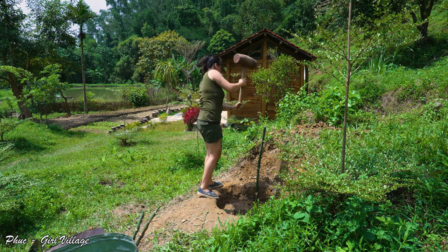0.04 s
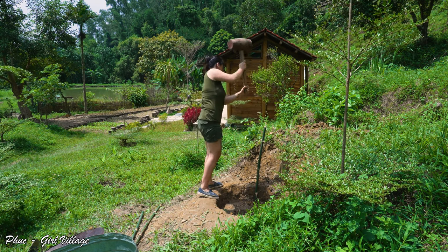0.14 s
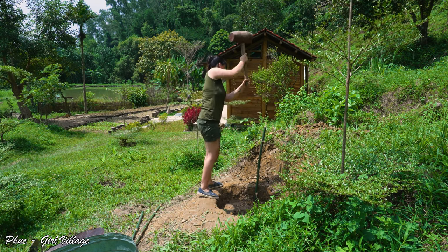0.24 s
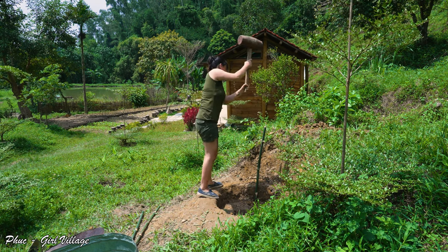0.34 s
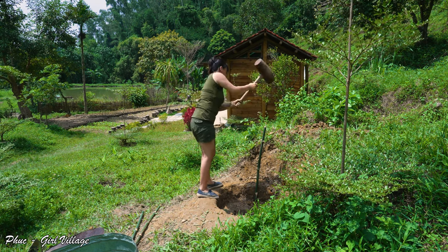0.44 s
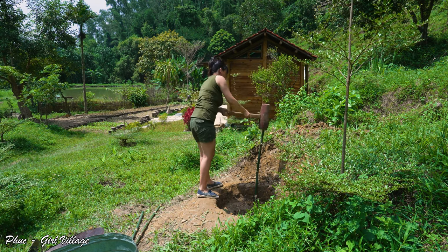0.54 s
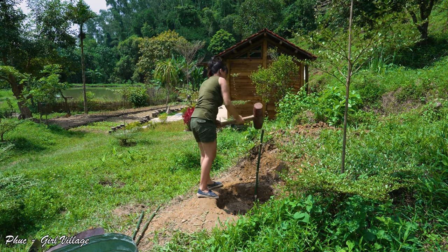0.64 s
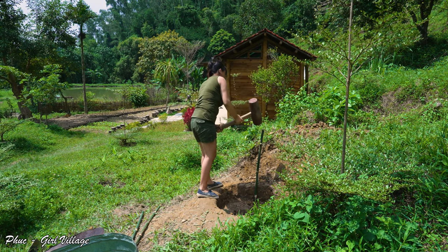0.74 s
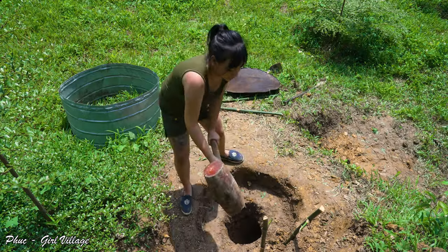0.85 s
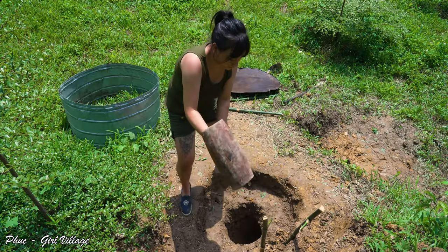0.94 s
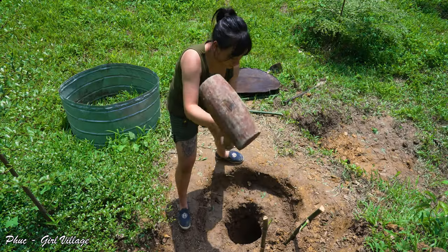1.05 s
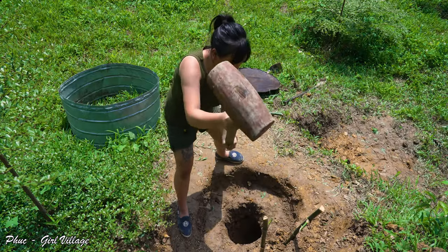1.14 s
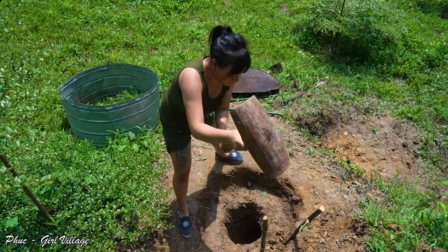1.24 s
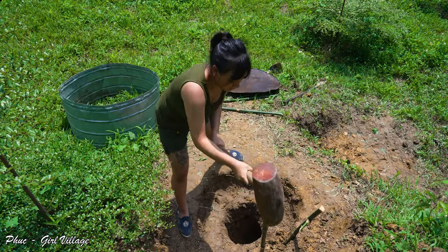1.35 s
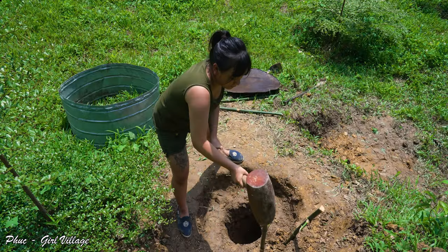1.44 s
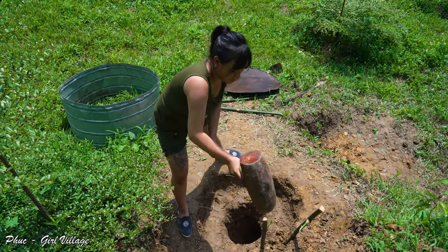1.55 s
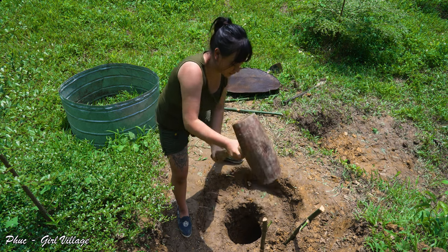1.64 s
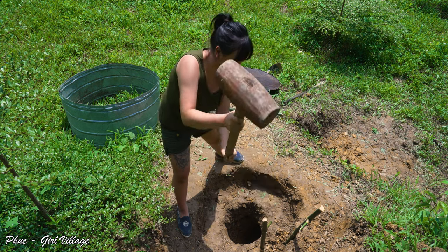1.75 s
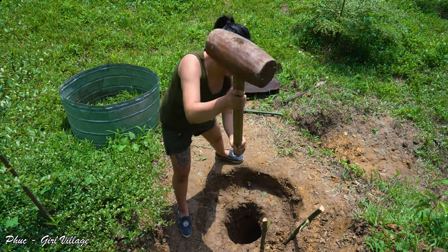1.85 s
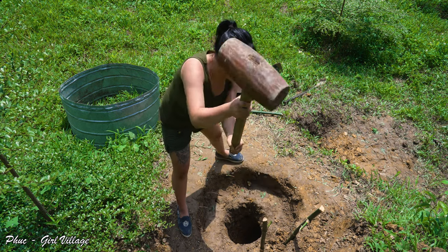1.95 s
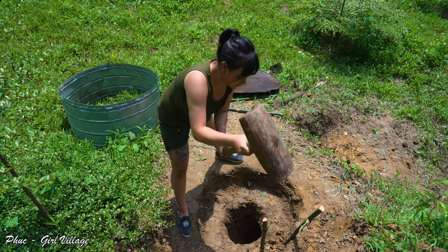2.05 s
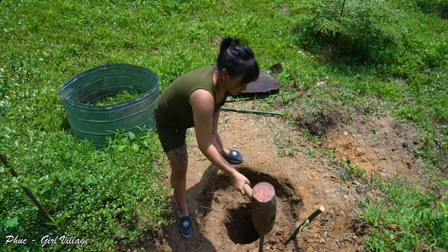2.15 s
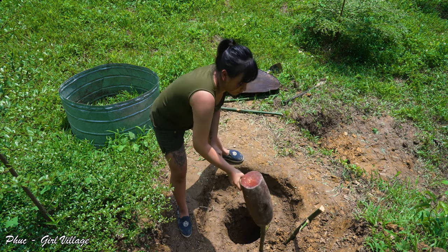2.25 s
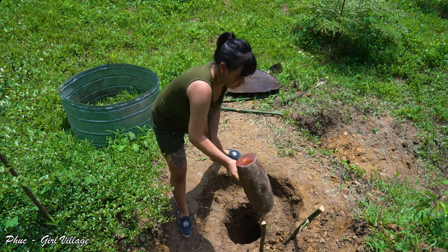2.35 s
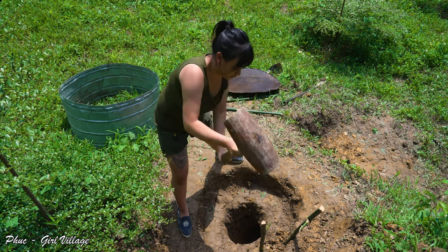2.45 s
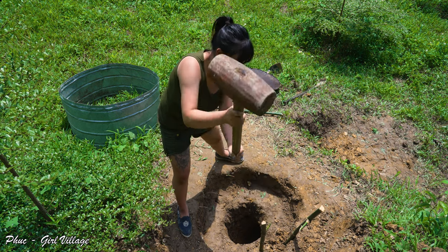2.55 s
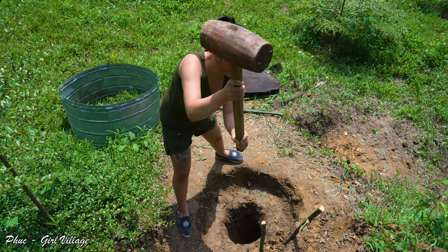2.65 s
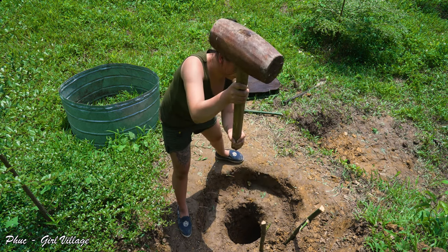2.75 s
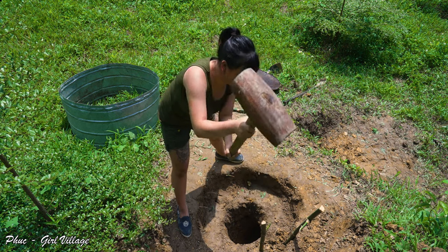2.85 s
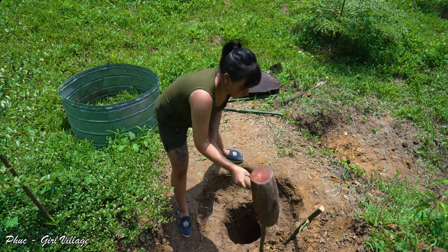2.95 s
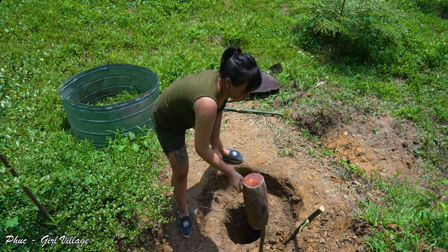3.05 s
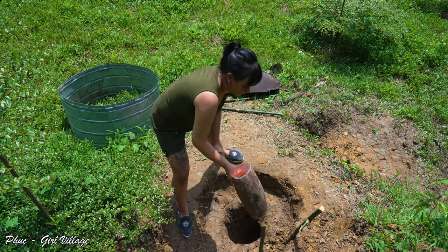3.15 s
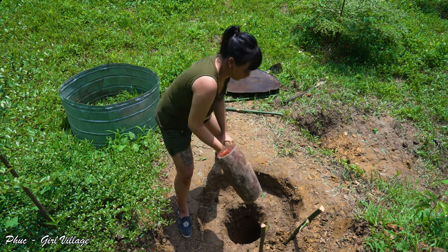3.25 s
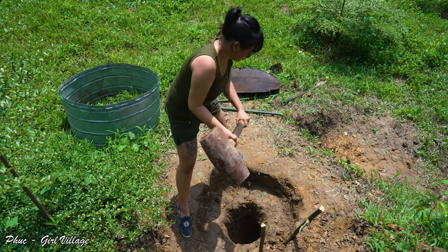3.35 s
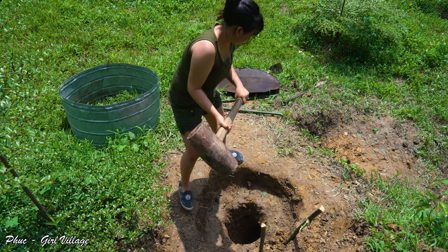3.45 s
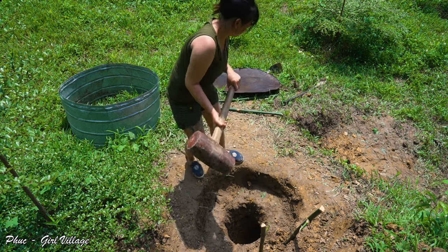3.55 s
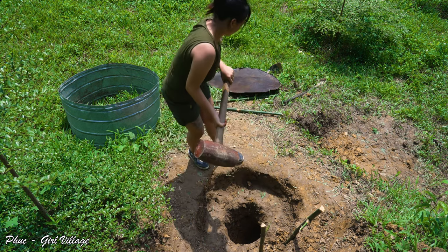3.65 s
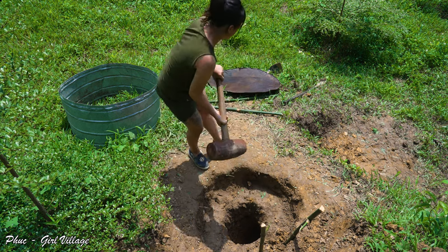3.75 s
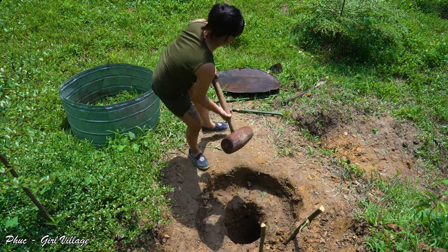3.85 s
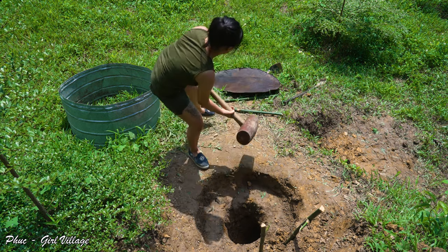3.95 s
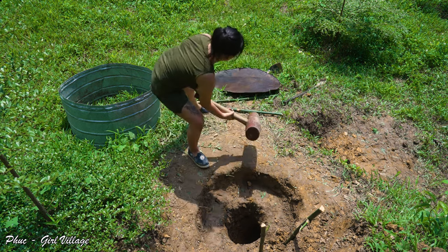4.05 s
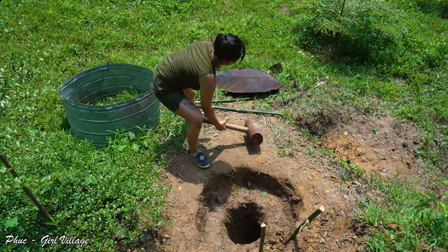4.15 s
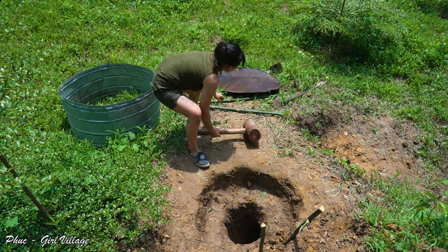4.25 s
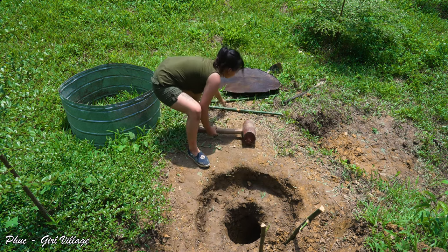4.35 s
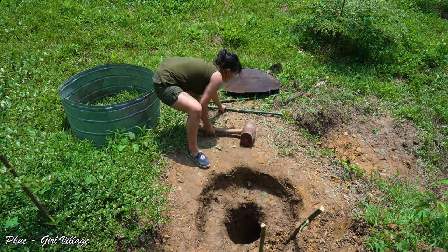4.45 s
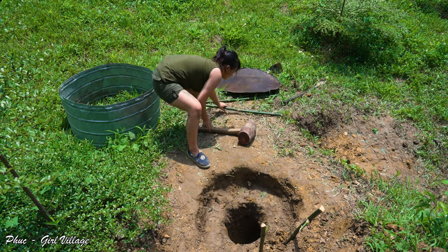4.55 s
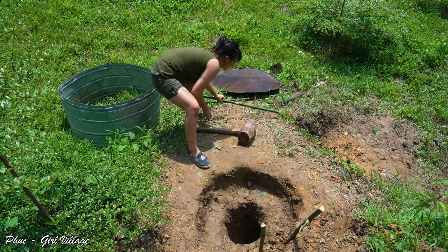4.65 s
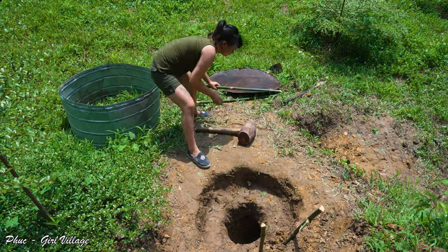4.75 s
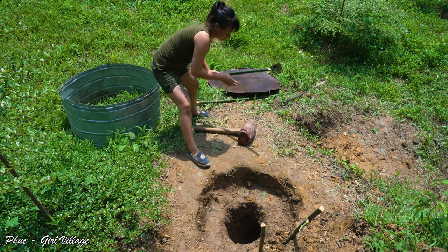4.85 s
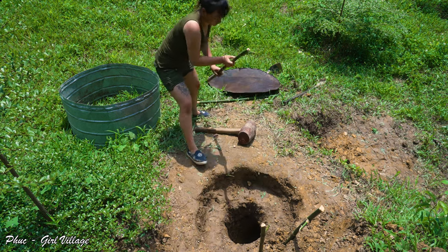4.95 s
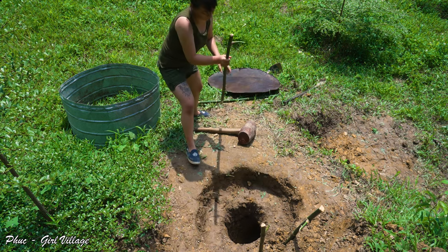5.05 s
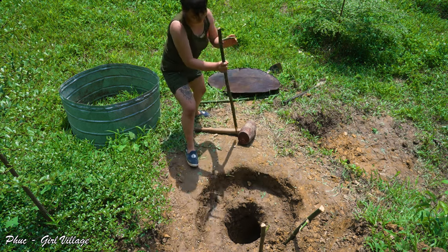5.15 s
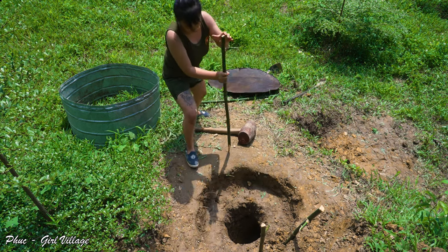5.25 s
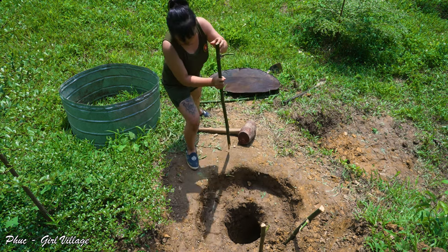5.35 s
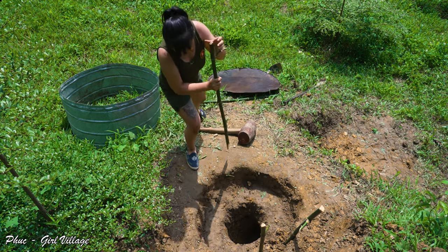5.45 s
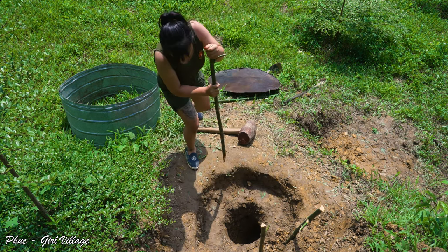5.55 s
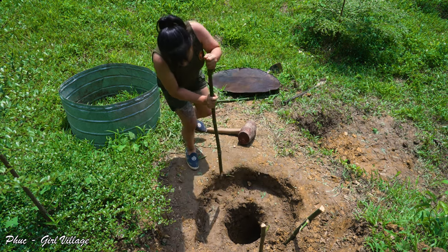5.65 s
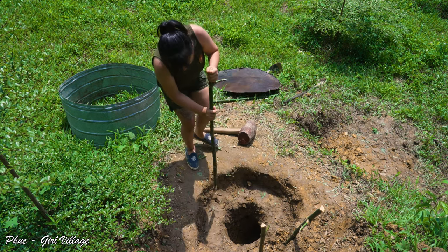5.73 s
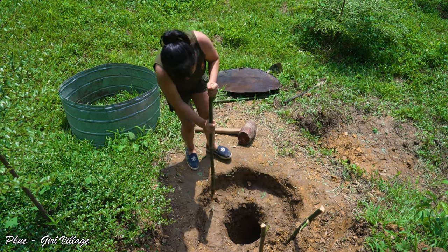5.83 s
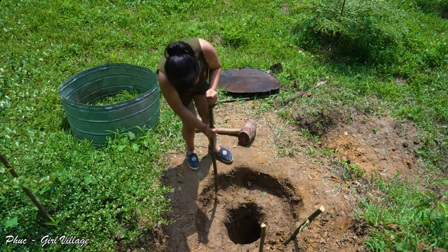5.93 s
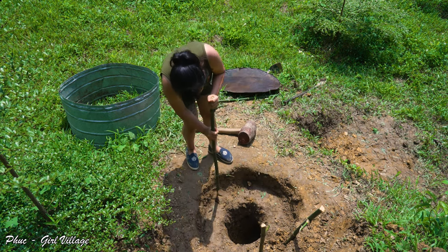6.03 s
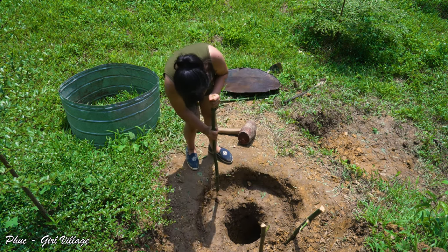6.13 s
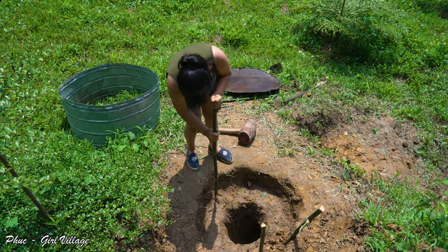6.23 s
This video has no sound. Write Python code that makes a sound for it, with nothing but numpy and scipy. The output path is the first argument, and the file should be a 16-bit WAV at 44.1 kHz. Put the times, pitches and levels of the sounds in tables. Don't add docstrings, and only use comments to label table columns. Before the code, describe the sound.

Four dull woody mallet blows with low ground thuds, outdoors over soft hiss, then a dropped mallet, a hollow pole's clack and a twig snap.

```python
import sys
import numpy as np
from scipy import signal
from scipy.fft import rfft, irfft
from scipy.io import wavfile
from scipy.ndimage import uniform_filter1d

SR = 44100
rng = np.random.default_rng(int(sys.argv[2]) if len(sys.argv) > 2 else 0)


def level_to_linear(level):
    exponent = np.asarray(level, float) / 20
    return 10 ** exponent


def generate_wav(signal):
    frames = np.transpose(np.atleast_2d(signal))
    scaled = np.clip(frames, -1, 1) * 32767
    pcm = np.round(scaled).astype(np.int16)
    wavfile.write(sys.argv[1], SR, pcm)


N = 277380

LOCKING = .3

# t/s, strength level/dB, contact/ms, rebound/ms, ground thud level/dB
BLOW_EVENTS = [
    (0.6235, 0.3, .85, .8, -39),
    (1.4466, -1.6, 0.64, 1.0, -37.5),
    (2.2149, 1.1, 0.36, .73, -39),
    (3.0530, 1.7, 0.3, .72, -36.5),
]
# chatter lag/ms, chatter length/ms, crack level/dB, soil echo/ms
FACE_CONTACTS = [(.58, 2.6, -39.5, 0), (.9, 5.0, -37.5, 2.86), (2.0, 2.2, -35.5, 2.777),
                 (1.2, 4.9, -28.5, 2.432)]
# f/Hz, t60/s, lag/ms, level/dB
FAR_WOOD_MODES = [(121, 0.06, 1.2, -29), (179, .05, 1.2, -22), (264, 0.021, 0.67, -10),
                  (415, 0.012, 1.12, -15), (550, .035, .9, -26.5), (738, 0.012, 0.97, -20),
                  (1100, 0.012, 0.26, -19), (1280, .014, .3, -21), (1450, 0.016, 0.47, -19),
                  (1690, 0.012, 0.193, -16.5), (2300, 0.013, .3, -24), (2560, .014, 0.5, -20),
                  (3020, 0.013, 0.37, -29), (3750, 0.0083, 0.335, -25.5), (5020, .01, .3, -34.5),
                  (5750, .008, .3, -41)]
# f/Hz, t60/s, lag/ms, level/dB
NEAR_HEAD_MODES = [(132, .073, 5.16, -19.4), (216, .087, 3.0, -31.5), (342, .053, .77, -19.1),
                   (469, .02, .11, -11.1), (598, .032, .2, -23.5), (677, .045, .1, -27),
                   (852, .029, .17, -23.5)]
# f/Hz, t60/s, level/dB
NEAR_STAKE_MODES = [(1000, .022, -16.5), (1180, .022, -21), (1364, .017, -16.5), (1580, .019, -19.5),
                    (1800, .017, -21), (2190, .02, -23.5), (2400, .016, -17.5), (2706, .022, -20),
                    (3160, .016, -22.5), (3460, .017, -24), (3754, .015, -24), (4510, .016, -24),
                    (4900, .012, -26.5)]
# f/Hz, t60/s, level/dB
BOUNCE_MODES = [(380, .04, -44), (560, .045, -39), (780, .04, -39), (1050, .03, -40), (1350, .025, -44),
                (2300, .015, -57)]
BOUNCE_S = .6752
PUSHED_BELOW_HZ = 900
REBOUND_DB = -.4
TAIL_DB, FAR_TAIL_LOSS_DB = -44, 6.0
TREMBLE_DB = -14.5


def blows():
    out = np.zeros(N)
    small_source = signal.butter(2, 85, "high", fs=SR, output="sos")
    near = NEAR_HEAD_MODES + [(hz, t60, 0, db) for hz, t60, db in NEAR_STAKE_MODES]
    for k, (s, force_db, contact_ms, rebound_ms, thud_db) in enumerate(BLOW_EVENTS):
        lag_ms, length_ms, crack_db, echo_ms = FACE_CONTACTS[k]
        far = k == 0
        if far:
            modes = FAR_WOOD_MODES
        else:
            modes = [(hz, t60, lag, db + force_db + soil_echo_db(hz, echo_ms)) for hz, t60, lag, db in near]
        low = sum(level_to_linear(db) * ring(hz, t60, lag) for hz, t60, lag, db in modes if hz < PUSHED_BELOW_HZ)
        high = [(hz, t60, db) for hz, t60, lag, db in modes if hz >= PUSHED_BELOW_HZ]

        facing = -1 if far else 1
        knock = facing * signal.sosfilt(small_source, signal.fftconvolve(low, push(contact_ms)))
        add(out, s, knock)
        add(out, s + rebound_ms / 1000, -level_to_linear(REBOUND_DB) * knock)
        add(out, s, level_to_linear(force_db) * rattled(high, chatter(lag_ms, length_ms), LOCKING))

        add(out, s, level_to_linear(crack_db) * dying_noise(3400, 9400, 0.0011, 0.04, size=4000))
        add(out, s, level_to_linear(crack_db - 11.5) * dying_noise(10000, 16800, 0.0009, 0.036, size=4000))
        add(out, s, level_to_linear(crack_db + 11.0) * dying_noise(1000, 4400, .002, .036, size=4000))
        tail_db = TAIL_DB + force_db - FAR_TAIL_LOSS_DB * far
        add(out, s, level_to_linear(tail_db) * dying_noise(540, 780, 0.011, .22, size=12000))
        add(out, s + .006, thud(thud_db, thud_db + TREMBLE_DB))
    add(out, BOUNCE_S, rattled(BOUNCE_MODES, chatter(.8, 9.0)))
    return out


SOIL_ECHO = -.39


def soil_echo_db(hz, echo_ms):
    return 20 * np.log10(np.abs(1 + SOIL_ECHO * np.exp(-2j * np.pi * hz * echo_ms / 1000)))


# f/Hz, t60/s, lag/ms, level/dB
GROUND_MODES = [(59, .38, 11.0, 0), (38, .35, 24, -19), (105, .12, 12.0, -10), (86, .2, 4.0, -6),
                (213, .5, 30, -25)]
SAG_HZ, SAG_S = -9.0, 0.048


def thud(db, tremble_db):
    out = level_to_linear(tremble_db) * dying_noise(49.5, 65, 0.061, 1.5, size=52920)
    for hz, t60, lag_ms, mode_db in GROUND_MODES:
        t = np.maximum(np.arange(52920) / SR - lag_ms / 1000, 0)
        turns = hz * t + SAG_HZ * SAG_S * (1 - np.exp(-t / SAG_S))
        swell = 1 - np.exp(-t / 0.0047)
        out = out + level_to_linear(db + mode_db - 60 * t / t60) * np.sin(2 * np.pi * turns) * swell
    return out


# f/Hz, t60/s, level/dB
HANDLE_MODES = [(200, .04, -44), (490, .03, -38), (1100, .012, -44), (1900, .01, -44)]
HANDLE_S = 4.2240
# t/s, contact/ms, wood level/dB, ground thud level/dB, trembling level/dB
HEAD_LANDING = (4.2558, .35, -28, -32, -46)
# f/Hz, t60/s, lag/ms, level/dB
DROPPED_MODES = [(125, .025, 1.2, -4), (220, .03, 1.2, -10), (333, 0.013, 0.082, -3), (740, 0.0098, .1, -5),
                 (960, .014, 0.12, -10), (1200, 0.012, 0.035, 1), (2300, 0.0087, 0.18, 0.5),
                 (2860, .006, 0.076, -8), (3500, 0.0084, 0.075, 1), (4540, 0.0085, 0.077, 4.5),
                 (5700, .005, .1, 6)]


def dropped_mallet():
    out = np.zeros(N)
    handle = sum(level_to_linear(db) * ring(hz, t60, size=4410) for hz, t60, db in HANDLE_MODES)
    add(out, HANDLE_S, -signal.fftconvolve(handle, push(.4)))

    s, contact_ms, wood_db, thud_db, tremble_db = HEAD_LANDING
    body = 0
    for hz, t60, lag_ms, db in DROPPED_MODES:
        facing = 1 if hz < 260 else -1
        body = body + facing * level_to_linear(db) * ring(hz, t60, lag_ms, size=4410)
    knock = level_to_linear(wood_db) * signal.fftconvolve(body, push(contact_ms))
    add(out, s, knock)
    add(out, s + .0011, level_to_linear(-2.5) * knock)
    add(out, s + .001, thud(thud_db, tremble_db))
    return out


# t/s, scrape/ms, level/dB, brightness/dB per octave, freedom (1 = hanging free)
POLE_TOUCHES = [
    (4.601, 7.8, -56, 3, 1),
    (5.251, 3.3, -36.5, .5, 0.16),
    (5.2564, 2.0, -38.5, 1, 0.054),
    (5.259, 16, -44.5, -1.8, 0.24),
]
# f/Hz, t60/s, level gripped/dB, level hanging free/dB
POLE_MODES = [(215, .2, -16, -20), (664, 0.097, -16, 1), (915, 0.083, -13, -18), (1300, 0.034, -4.5, -18),
              (1590, 0.037, -9, 4), (2090, 0.019, 1, -16), (2480, 0.022, -0.5, 0), (2980, 0.018, 1, -16),
              (3500, 0.011, -3, -14), (4010, .014, 0, -1), (4800, 0.013, -3, -14), (5430, 0.0093, -3, -16),
              (7600, .008, -9, -22), (9700, 0.009, -6, -24), (12200, .006, -16, -26)]


def pole():
    out = np.zeros(N)
    for s, scrape_ms, level_db, tilt_db, free in POLE_TOUCHES:
        modes = []
        for hz, t60, gripped_db, free_db in POLE_MODES:
            mode_db = free_db if round(free) else gripped_db
            modes.append((hz, t60 * (1 + 2.2 * free), mode_db + tilt_db * np.log2(hz / 2000)))
        add(out, s, level_to_linear(level_db) * rattled(modes, chatter(0.07, scrape_ms), LOCKING * free))
    return out


# f/Hz, t60/s, level/dB
TWIG_MODES = [(600, .008, -45), (1200, .006, -42), (2300, .005, -43), (3400, 0.0036, -32),
              (4340, .006, -32), (5040, 0.0045, -33), (6700, .005, -46), (8500, 0.0034, -42),
              (10800, .004, -42), (13500, .003, -48)]
TWIG_S = 5.3743


def twig():
    out = np.zeros(N)
    add(out, TWIG_S, rattled(TWIG_MODES, chatter(.05, 0.49)))
    return out


# low f/Hz, high f/Hz, rise as share of the fall
GRASS_KIND = (7500, 15500, .7)
SWISH_KIND = (7500, 15500, 1.6)
GRIT_KIND = (4500, 13500, .23)
CRUNCH_KIND = (1600, 4800, .6)
STEP_KIND = (450, 2100, .5)
CLOTH_KIND = (450, 2100, 2.5)
HEEL_KIND = (96, 180, 1.05)
# t/s, fall/ms, level/dB rms
GRASS_EVENTS = [(1.222, 5, -74), (3.67, 8, -74), (5.346, 8, -73), (5.98, 10, -77)]
SWISH_EVENTS = [(4.225, 43, -71), (4.6, 24, -72), (5.56, 17, -78)]
GRIT_EVENTS = [(.676, 9, -67), (4.256, 4.1, -52), (5.251, 9, -45.5), (5.376, 2.5, -59)]
CRUNCH_EVENTS = [(.631, 2.6, -43), (.68, 6, -57), (4.258, 3.3, -43), (5.254, 8, -46), (5.347, 6, -50.5)]
STEP_EVENTS = [(3.668, 15, -56), (4.242, 2.5, -52)]
CLOTH_EVENTS = [(1.18, 20, -58)]
HEEL_EVENTS = [(.71, 20, -47.5)]


def scuffs():
    out = np.zeros(N)
    t_ms = (np.arange(17640) - 11025) / SR * 1000
    kinds = [(GRASS_KIND, GRASS_EVENTS), (SWISH_KIND, SWISH_EVENTS), (GRIT_KIND, GRIT_EVENTS),
             (CRUNCH_KIND, CRUNCH_EVENTS), (STEP_KIND, STEP_EVENTS), (CLOTH_KIND, CLOTH_EVENTS),
             (HEEL_KIND, HEEL_EVENTS)]
    for (low_hz, high_hz, rise), events in kinds:
        band_pass = signal.butter(2, [low_hz, high_hz], "band", fs=SR, output="sos")
        for s, fall_ms, db in events:
            grains = rng.standard_normal(len(t_ms)) * level_to_linear(3.9 * rng.standard_normal(len(t_ms)))
            band = signal.sosfilt(band_pass, grains)
            swell = np.exp(np.where(t_ms < 0, t_ms / (rise * fall_ms), -t_ms / fall_ms))
            add(out, s - .25, level_to_linear(db) * rms_one(band) * swell)
    return out


# t/s, level/dB
GUST_LEVEL = [(0.0, -42), (0.232, -36.5), (0.646, -45.5), (0.806, -51.5), (1.098, -71), (1.25, -67),
              (1.4, -74)]
# f/Hz, level/dB per Hz
GUST_SPECTRUM = [(8.8, -41), (15, 11), (27, -8.5), (49, 5), (64, 14), (78, 3), (102, -4), (124, -4),
                 (157, -26), (220, -40), (290, -68), (480, -120)]


def gust():
    t = np.arange(N) / SR
    rumble = coloured(GUST_SPECTRUM, patchy_db=1.5, rate=8.0, count=10, size=80000)
    rumble = rumble / np.sqrt(uniform_filter1d(rumble ** 2, size=6000) + .05)
    gust_db = np.interp(t, *np.transpose(GUST_LEVEL)) - 30 * np.maximum(t - GUST_LEVEL[-1][0], 0)
    return level_to_linear(gust_db - 1.5) * rumble


# f/Hz, level/dB per Hz
FAR_AIR_SPECTRUM = [(100, -33), (170, -1.5), (269, -13), (366, -10.5), (506, -15), (536, -13.5),
                    (1070, -15.5), (1240, -15), (1510, -17), (2300, -16.5), (2950, -21), (4850, -19),
                    (7970, -36), (15000, -42), (16500, -50)]
# f/Hz, level/dB per Hz
NEAR_AIR_SPECTRUM = [(12, -33), (20, -12), (32, -1), (63, -2), (135, -4), (218, -3), (258, -5.5),
                     (416, -4.5), (652, -7), (1470, -8), (2240, -11.5), (4790, -9.5), (6350, -18),
                     (15200, -37), (16500, -41)]
FAR_AIR_DB, NEAR_AIR_DB = -60, -57
SCENE_CHANGE_S = .822


def air():
    near = np.clip((np.arange(N) / SR - SCENE_CHANGE_S) / 0.0075, 0, 1)
    far_hiss = level_to_linear(FAR_AIR_DB) * coloured(FAR_AIR_SPECTRUM, patchy_db=-0.1, rate=18.0, size=40000)
    near_hiss = level_to_linear(NEAR_AIR_DB) * coloured(NEAR_AIR_SPECTRUM, patchy_db=0.77, rate=12.0)
    quiet_gap = signal.butter(1, [26, 44], "bandstop", fs=SR, output="sos")
    near_hiss = signal.sosfilt(quiet_gap, near_hiss)
    return far_hiss * (1 - near) + near_hiss * near


def push(ms):
    t = np.arange(200) / SR * 1000 / max(ms, .05)
    force = np.sin(np.pi * np.minimum(t, 1)) ** 2
    return force / force.sum()


def chatter(lag_ms, length_ms, spread_db=3.0):
    height, unevenness, chance = rng.standard_normal((3, 2000))
    t = np.arange(2000) / SR * 1000 - lag_ms
    slips = height * level_to_linear(spread_db * unevenness) * (chance > 1.2)
    slips = slips * (t > 0) * np.exp(-(t / length_ms) ** 2 * 2)
    slips = slips / np.sqrt(np.sum(slips ** 2))
    slips[8] += .35
    return slips


def ring(hz, t60, lag_ms=0, size=22050):
    t = np.maximum(np.arange(size) / SR - lag_ms / 1000, 0)
    return np.sin(2 * np.pi * hz * t) * level_to_linear(-60 * t / t60)


def rattled(modes, slips, locking=0):
    out = 0
    t = (np.arange(len(slips)) - 8) / SR
    for j, (hz, t60, db) in enumerate(modes):
        clean = ring(hz, t60, size=8820)
        in_step = np.abs(slips) * np.sign(np.cos(2 * np.pi * hz * t))
        shaken = signal.fftconvolve(clean, slips + locking * in_step)
        same_energy = np.sqrt(np.sum(clean ** 2) / np.sum(shaken ** 2))
        out = out + level_to_linear(db) * (-1) ** j * shaken * same_energy
    return out


def dying_noise(low_hz, high_hz, rise_s, t60, size):
    t = np.arange(size) / SR
    band_pass = signal.butter(2, [low_hz, high_hz], "band", fs=SR, output="sos")
    band = signal.sosfilt(band_pass, rng.standard_normal(size + 9000))[9000:]
    return rms_one(band) * (1 - np.exp(-(t / rise_s) ** 2)) * level_to_linear(-60 * t / t60)


def coloured(spectrum, patchy_db, rate, count=22, size=N):
    hz = np.fft.rfftfreq(size, 1 / SR)
    point_hz, point_db = np.transpose(spectrum)
    level_db = np.interp(np.log(hz + 1e-9), np.log(point_hz), point_db, left=-90, right=-90)
    shaped = rfft(rng.standard_normal(size)) * level_to_linear(level_db)
    half_octave = np.log2(hz / 15 + 1e-9) * 2
    out = 0
    for k in range(count):
        share = np.clip(1 - np.abs(half_octave - k), 0, 1)
        knots = rng.standard_normal(200)
        flicker = np.interp(np.arange(size) / SR * rate, np.arange(200), knots)
        out = out + irfft(shaped * share, size) * level_to_linear(patchy_db * flicker)
    return np.pad(rms_one(out), (0, N - size))


def rms_one(x):
    return x / np.sqrt(np.mean(x ** 2) + 1e-20)


def add(out, s, sound):
    i = round(s * SR)
    out[i:i + len(sound)] += sound[:N - i]


def scene():
    return (blows() + dropped_mallet() + pole() + twig() + scuffs() + gust() + air())[None]


def band_limit(x):
    return signal.sosfilt(signal.butter(12, 16820, fs=SR, output="sos"), x)


def record(dry):
    fade = np.clip(np.arange(N) / SR / .002, 0, 1)
    rounded = .95 * np.tanh(dry * fade / .95)
    top_cut = signal.cheby2(10, 60, 17000, fs=SR, output="sos")
    mix = signal.sosfilt(top_cut, rounded)
    return band_limit(mix)


dry = scene()
out = record(dry)
generate_wav(out)
```